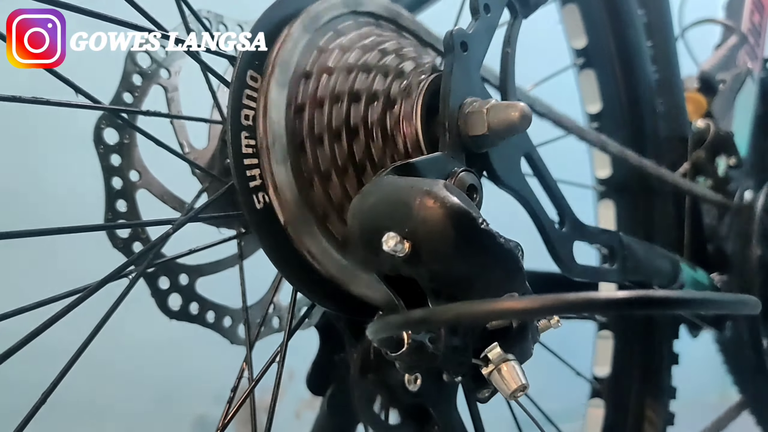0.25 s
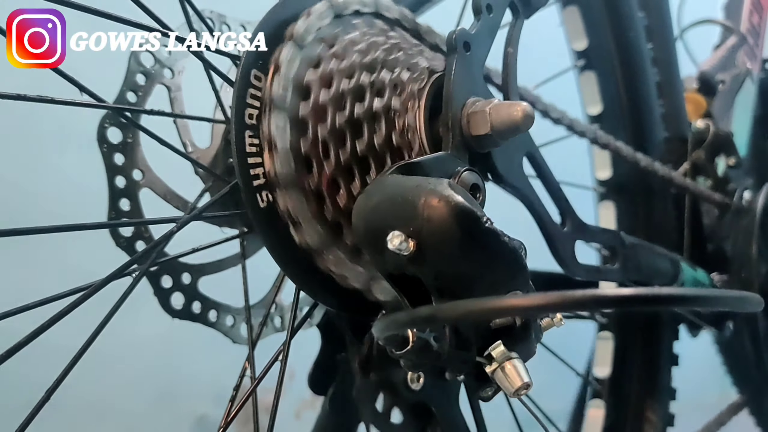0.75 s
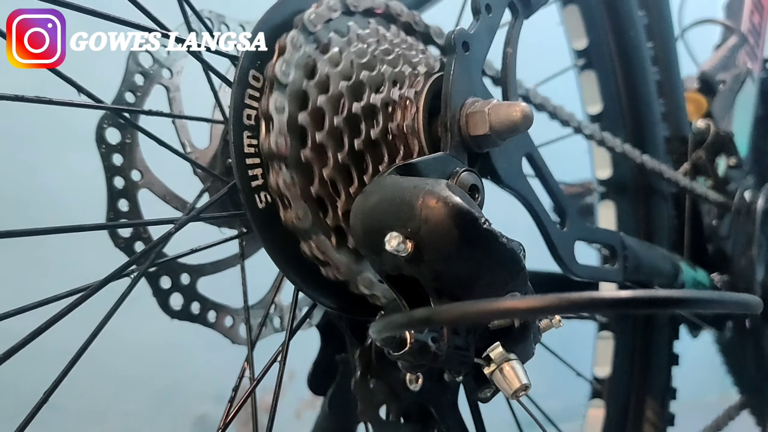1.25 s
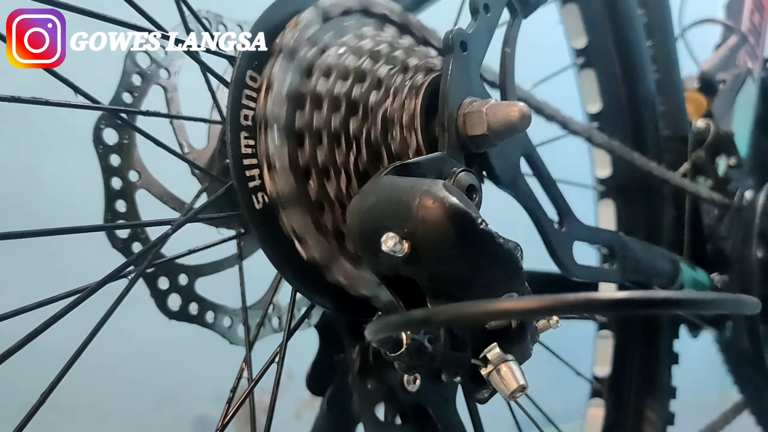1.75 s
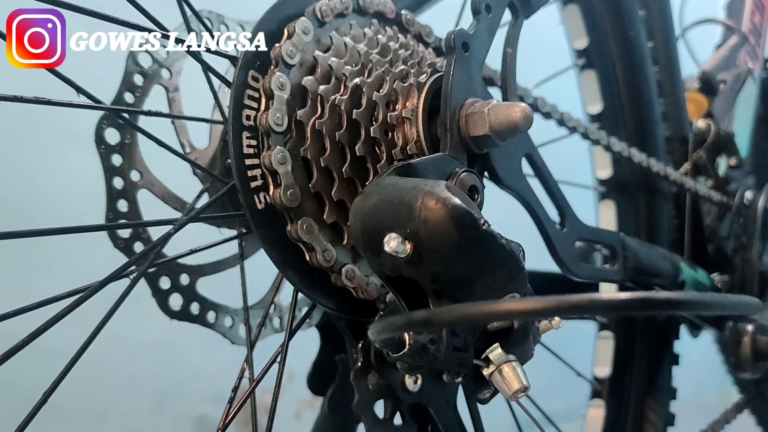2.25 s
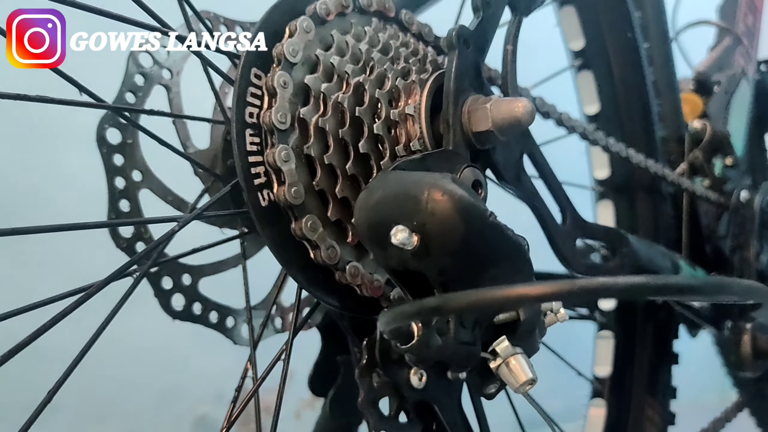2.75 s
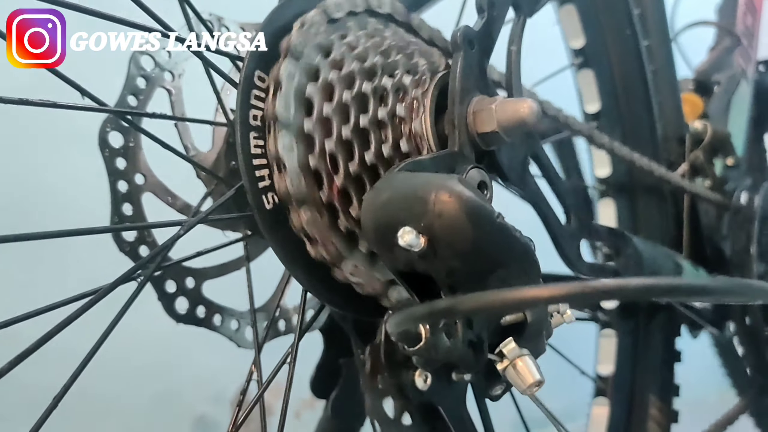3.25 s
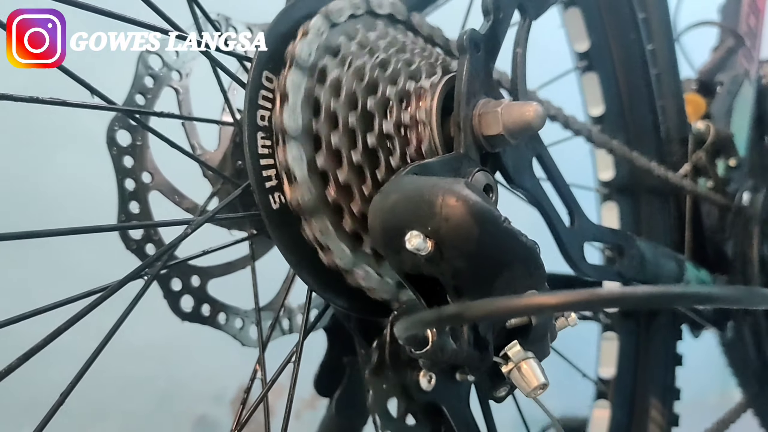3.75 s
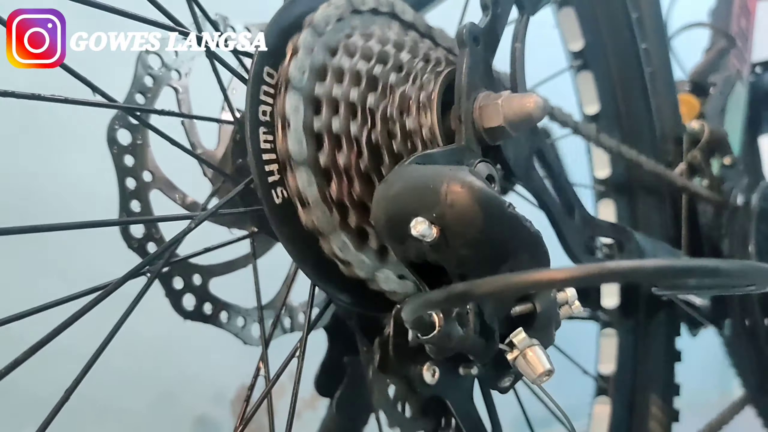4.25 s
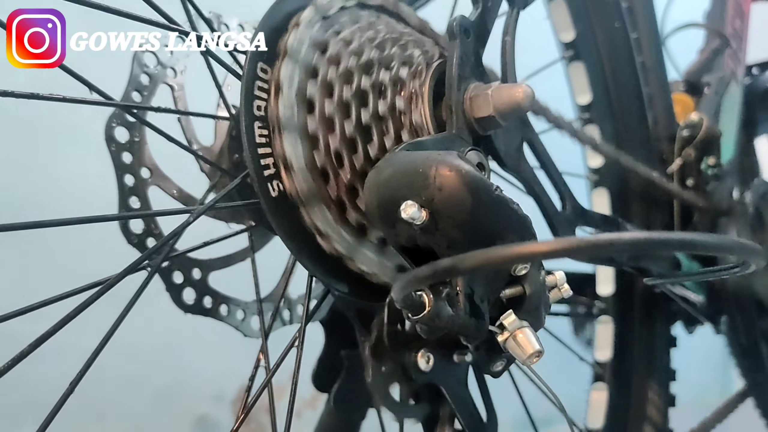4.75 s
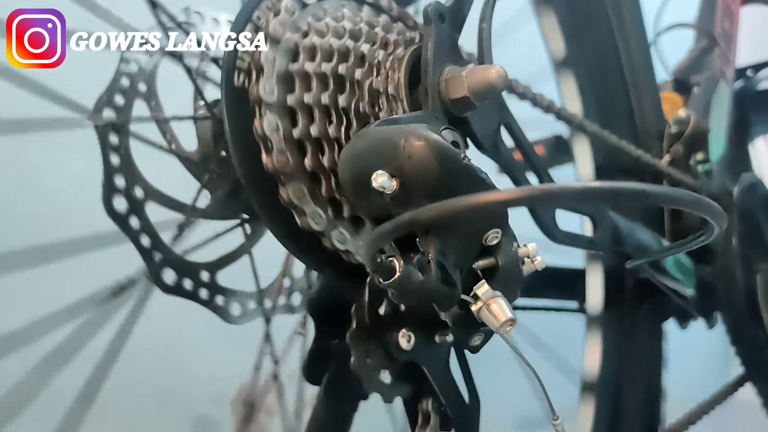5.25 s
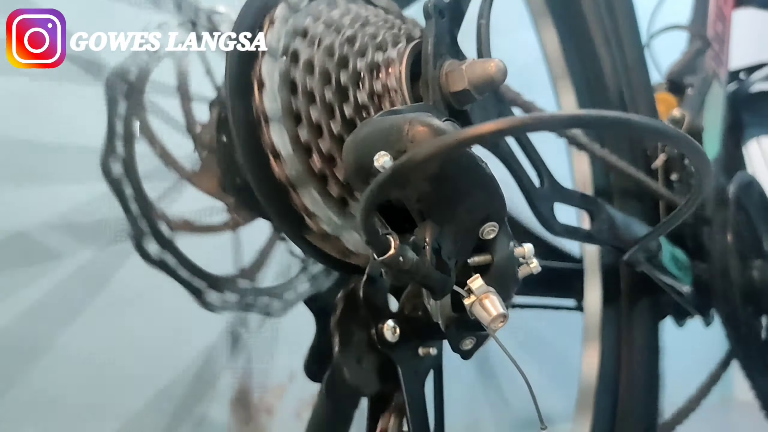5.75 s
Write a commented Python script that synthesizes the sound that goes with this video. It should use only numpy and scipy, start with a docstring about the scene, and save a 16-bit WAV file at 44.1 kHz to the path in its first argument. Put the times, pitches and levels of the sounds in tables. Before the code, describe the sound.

Close beside a bicycle's rear sprockets in a ringing room, the chain runs backwards with a soft whir and rapid bright ratchet ticks. The frame suddenly clacks and judders loudly, leaving a metallic ring. The ticking slows to a stop, dull thuds follow, then a second spin clicks along with sharp snaps. Finally the chain drives forward, rasping, humming and knocking.

```python
"""Bicycle drivetrain in a ringing room

Heard from beside the rear sprockets of a bicycle on a stand. The pedals turn backwards in two spins: jockey-wheel
rollers whir as bands of noise and freewheel pawls tick once a ratchet tooth. The frame clacks and judders in two
ringing modes. Gear parts snap as shaped noise with a short ring, and an askew chain rasps in dense grains.
Driven forwards at the end, the chain hums, rasps and knocks. A room tail follows the blows, ticks and squawks."""
import sys
import numpy as np
from scipy import signal
from scipy.fft import rfft, irfft, next_fast_len
from scipy.io import wavfile
from scipy.ndimage import uniform_filter1d, map_coordinates

SR = 44100
rng = np.random.default_rng(int(sys.argv[2]) if len(sys.argv) > 2 else 0)


def master_out(mix):
    """Clip the mix to full scale and print it as 16-bit PCM to the path in sys.argv[1]."""
    frames = np.transpose(np.atleast_2d(mix))
    ceiling = np.clip(frames, -1, 1)
    pcm = np.round(ceiling * 32767).astype(np.int16)
    wavfile.write(sys.argv[1], SR, pcm)


N = 264159
EASY_SPEED = 30  # ratchet teeth per s at which speed-dependent levels are stated

# sprocket speed in the two backward spins: time_s, speed [ratchet teeth per s]
FIRST_SPIN = [(0.008, 40.13), (0.325, 51.08), (0.504, 61.92), (0.51, 52.77), (0.784, 33.95), (0.848, 42.79),
              (0.984, 24.99), (1.078, 23.06), (1.175, 24.68), (1.443, 20.2), (1.723, 30.56), (1.734, 39.79),
              (1.949, 34.84), (2.062, 30.74), (2.256, 4.65)]
SECOND_SPIN = [(3.066, 17.27), (3.431, 19.66), (3.451, 25.43), (3.626, 17.13), (3.824, 30.08),
               (3.991, 22.2), (4.228, 31.42), (4.328, 24.77), (4.575, 28.86), (4.644, 20.18)]
# colour of rustling links and loose rollers: frequency_hz, level_db [per Hz]
RUSTLE_TONE = [(600, -36), (1500, -6.5), (2200, 0), (3000, 4.5), (5000, 2), (8000, -6.5), (12500, 1.5),
               (16000, 1.5)]
# resonances of sprockets and derailleur: centre_hz, width_hz, gain_db
STEEL_MODES = [(1430, 110, 4), (1677, 90, 6.5), (2390, 90, 4.5), (2970, 120, 4.5), (3390, 45, 7.5),
               (3840, 1000, 4.5), (4700, 200, 3.5), (5010, 120, 1.5), (7120, 200, 4), (7380, 120, 0)]


def amp(db):
    """Decibels to gain."""
    return 10 ** (np.asarray(db) / 20)


def unit(x):
    """Scale to rms 1."""
    return x / np.sqrt(np.mean(x ** 2) + 1e-20)


def along(points, hz):
    """Read (Hz, value) points on a log frequency axis."""
    f, v = np.transpose(points)
    return np.interp(np.log(hz + 1), np.log(f + 1), v)


def coloured(points):
    """Gain response that follows (Hz, dB) points."""
    return lambda hz: amp(along(points, hz))


def curves(rows):
    """One value per sample for each column after the time."""
    s, *columns = np.transpose(rows)
    return [np.interp(np.arange(N) / SR, s, column) for column in columns]


def wobble(rate):
    """A smooth random curve with rate knots a second."""
    knots = rng.standard_normal(int(N * rate / SR) + 4)
    return map_coordinates(knots, [np.arange(N) * rate / SR])


def filtered(x, response):
    """Weight the spectrum of x by a response of frequency."""
    n = x.shape[-1]
    padded = next_fast_len(n + 4096)
    spectrum = rfft(x, padded) * response(np.fft.rfftfreq(padded, 1 / SR))
    return irfft(spectrum, padded)[..., :n]


def add(track, s, sound):
    """Mix a sound into the track at time s."""
    i = max(round(s * SR), 0)
    part = track[..., i:i + sound.shape[-1]]
    part += sound[..., :part.shape[-1]]


def noise(n, tone=lambda hz: 1):
    """Stereo noise of rms 1, most alike in the low mids and nearly unrelated in the treble."""
    # likeness of left and right: frequency_hz, correlation [-1 to 1]
    likeness = [(60, 0.66), (380, 0.91), (950, 0.47), (2400, 0.077), (6000, 0.057)]

    def mid_side(hz):
        turn = np.arccos(np.clip(along(likeness, hz), -1, 1)) / 2
        return tone(hz) * np.array([np.cos(turn), np.sin(turn)])

    mid, side = filtered(rng.standard_normal((2, n)), mid_side)
    return unit(np.array([mid + side, mid - side]))


def resonances(modes, hz):
    """Summed dB peaks and hollows, as a gain."""
    return amp(sum(db / (1 + (2 * (hz - centre) / width) ** 2) for centre, width, db in modes))


def room(x):
    """The room's answer: a diffuse tail of unit energy on the left, each frequency dying at its own speed."""
    # reverberation time: frequency_hz, t60_s
    decay_times = [(100, 0.39), (600, 0.7), (2000, 0.51), (5000, 0.6), (10000, 0.52), (15000, 0.47)]
    hz, t, bins = signal.stft(noise(SR), SR, nperseg=256)
    t60 = np.maximum(along(decay_times, hz), .05)[:, None]
    tail = signal.istft(bins * amp(-60 * t / t60), SR, nperseg=256)[1]
    tail *= 1 - np.exp(-np.arange(tail.shape[1]) / SR / .0016)  # builds up over a few ms
    return signal.fftconvolve(x, tail / np.linalg.norm(tail[0]), axes=1)


def spin_speed(spin):
    """Teeth per second at each sample, zero outside the spin."""
    s, speed = np.transpose(spin)
    return np.interp(np.arange(N) / SR, s, speed, left=0, right=0)


def whir():
    """Rollers drum on the jockey wheels: a narrow noise band glides along the roller pitch."""
    # roller whir: time_s, pitch_hz, level_db
    whir_path = [(0, 386, -61.5), (.2, 385.9, -63.5), (.36, 388.4, -56), (.55, 388, -61), (.85, 388, -66),
                 (1.05, 378.9, -64.5), (1.2, 381.8, -70.5), (1.4, 388.1, -67.5), (1.9, 393, -59.5),
                 (2.15, 374, -65.5), (2.5, 344.8, -79), (3, 359, -76.5), (3.25, 348.3, -63.5),
                 (3.45, 365.6, -75), (3.9, 378.6, -69.5), (4.3, 381.9, -69), (4.75, 372.7, -59.5),
                 (5.3, 369.6, -62), (5.99, 364, -62.5)]
    width_hz = 42
    pitch, level_db = curves(whir_path)
    centre = np.mean(pitch)

    def peak(hz):
        return (1 + ((hz - centre) / width_hz) ** 2) ** -1.1 * hz / np.hypot(hz, 200)

    band = signal.hilbert(noise(N, peak))
    # evenly spaced rollers keep the whir steady
    band /= np.sqrt(uniform_filter1d(np.mean(abs(band) ** 2, axis=0), SR // 8) / 2)
    glide = np.exp(2j * np.pi * np.cumsum(pitch - centre) / SR)
    return amp(level_db) * np.real(band * glide)


def clatter():
    """The links clatter as low-mid noise with a quickly fluctuating level."""
    # clatter level: time_s, level_db
    clatter_path = [(0, -59.5), (.25, -60), (.45, -56), (1.2, -70.5), (1.8, -59), (2.12, -59.5),
                    (2.35, -72), (2.7, -102), (3.68, -86), (3.79, -66.5), (4.15, -71.5), (4.55, -65),
                    (4.95, -58.5), (5.38, -65.5), (5.6, -61.5), (5.99, -61.5)]
    # clatter colour: frequency_hz, level_db [per Hz]
    clatter_colour = [(200, -14.5), (500, -0.5), (700, -1), (1100, -6.5), (1600, -1.5), (2200, -7),
                      (4000, -13)]
    [level_db] = curves(clatter_path)
    return amp(level_db) * unit(noise(N, coloured(clatter_colour)) * amp(1.8 * wobble(150)))


def rustle(speed, forwards):
    """The links rustle as grainy bright noise, louder with speed and much quieter when taut."""
    # growth with speed: level_db at EASY_SPEED, rise [dB per doubling], floor_db at rest
    easy_db, db_per_doubling, rest_db = (-57, 7.1, -73)
    taut_db, grain_db, pan_db = -26, 2, 1
    moving_db = easy_db + db_per_doubling * np.log2(np.maximum(speed, 1) / EASY_SPEED)
    level = np.hypot(amp(moving_db), amp(rest_db))
    grainy = unit(noise(N, coloured(RUSTLE_TONE)) * amp(grain_db * wobble(400)))
    return level * amp(taut_db * (forwards > 0)) * grainy * amp([[pan_db], [-pan_db]])


def rollers(speed):
    """Loose rollers tick faintly at random times, denser as the chain runs faster."""
    ticks_per_tooth, spread_db, level_db, life_s = 2, 3, -61, .0007
    strength = amp(spread_db * np.clip(rng.standard_normal(N), -2, 1))
    hits = (rng.random(N) < ticks_per_tooth * speed / SR) * strength
    gain = signal.lfilter([1], [1, -np.exp(-1 / (life_s * SR))], hits)
    return amp(level_db) * gain * noise(N, coloured(RUSTLE_TONE))


def grinding():
    """Link plates catch and slip in dense grains, now on one sprocket, now on its neighbour."""
    # rasp colour: frequency_hz, level_db [per Hz]
    rasp_colour = [(200, -42), (600, -49), (1200, -4.5), (1450, -1.5), (2500, 0.5), (4000, -5), (5000, 1.5),
                   (7300, -1.5), (8100, -1.5), (11000, 0), (13500, 1), (16000, 1.5)]
    sprocket_spread, wander_rate = .025, 14  # relative pitch spread; knots per s of the wandering
    grain_db, wander_db, ringing = 4, 3, 1.8  # ringing: exponent on the steel resonances
    out = np.zeros((2, N))
    for size in (1 - sprocket_spread, 1, 1 + sprocket_spread):
        grains = noise(N) * amp(grain_db * wobble(450) + wander_db * wobble(wander_rate))
        out += filtered(grains, lambda hz: coloured(rasp_colour)(hz) * resonances(STEEL_MODES, hz * size) ** ringing)
    return unit(out)


def scraping(rasp):
    """An askew chain scrapes the teeth beside it; a light scrape stirs only the higher resonances."""
    # scrapes: start_s, length_s, level_db, sag [dB per s, negative swells], lowest_hz
    scrapes = [(2.785, 0.29, -54.5, 40.5, 2580), (4.773, 0.35, -44, -13.5, 504)]
    attack_s, release_s = .079, .078
    t = np.arange(N) / SR
    out = np.zeros((2, N))
    for s, length, db, sag_db, lowest_hz in scrapes:
        swell = np.clip((t - s) / attack_s, 0, 1)
        release = np.exp(-np.maximum(t - s - length, 0) / release_s)
        scrape = filtered(rasp, lambda hz: hz ** 2 / np.hypot(hz ** 2, lowest_hz ** 2))
        out += amp(db - sag_db * np.clip(t - s, 0, length)) * swell * release * scrape
    return out


def mesh_hum():
    """Teeth meshing under drive hum as a sine with unsteady pitch and level."""
    # meshing hum: time_s, pitch_hz, level_db
    mesh_path = [(4.5, 298, -100), (4.7, 301.7, -65.5), (5, 312.8, -68), (5.3, 316, -64), (5.6, 314.5, -68),
                 (5.99, 308, -64.5)]
    pitch, level_db = curves(mesh_path)
    phase = 2 * np.pi * np.cumsum(pitch + 2 * wobble(18)) / SR
    return amp(level_db + 1.5 * wobble(12)) * np.sin(phase)


def chain():
    """All sounds of the running chain, with rustle and roller ticks tied to its speed."""
    # forward drive, pawls locked: time_s, speed [ratchet teeth per s]
    drive_path = [(4.65, 46), (4.8, 62), (5.08, 49), (5.38, 30), (5.55, 43), (5.72, 38), (5.99, 49)]
    forwards = spin_speed(drive_path)
    speed = np.maximum(spin_speed(FIRST_SPIN) + spin_speed(SECOND_SPIN), forwards)
    links = clatter() + rustle(speed, forwards)
    return whir() + links + rollers(speed) + scraping(grinding()) + mesh_hum()


def rumble():
    """The dull floor of stand and room, with a low hum that swells as the first spin runs out."""
    # rumble level before the common lift: time_s, level_db
    rumble_path = [(0, -79.5), (.35, -73), (1.2, -76), (2.25, -66), (2.8, -73), (3.55, -77), (3.9, -72.5),
                   (4.45, -78.5), (4.75, -72.5), (5.99, -74.5)]
    # rumble colour: frequency_hz, level_db [per Hz]
    rumble_colour = [(20, -16.5), (50, -12), (90, -10), (135, 0.5), (180, -1), (260, 4.5), (420, -1.5),
                     (540, -12), (680, -24.5), (1050, -35.5), (2000, -32)]
    # low hum: time_s, level_db
    hum_path = [(0, -84), (1.4, -78.5), (2, -74), (2.3, -67), (2.7, -73), (3.3, -85), (4.6, -85.5),
                (5.99, -80)]
    lift_db, hum_hz = 3, 139
    [floor_db] = curves(rumble_path)
    [hum_db] = curves(hum_path)
    hum_phase = 2 * np.pi * np.cumsum(hum_hz + 2 * wobble(20)) / SR
    hum = amp(hum_db + 2 * wobble(10)) * np.sin(hum_phase)
    return hum + amp(floor_db + lift_db) * noise(N, coloured(rumble_colour))


def pawl_drops():
    """(s, speed) each time a ratchet tooth passes during a backward spin."""
    drops = []
    for spin in (FIRST_SPIN, SECOND_SPIN):
        s, speed = np.transpose(spin)
        t = np.arange(s[0], s[-1], 1 / SR)
        teeth = np.cumsum(np.interp(t, s, speed)) / SR
        times = np.interp(np.arange(teeth[-1]), teeth, t)
        drops += zip(times, np.interp(times, s, speed))
    return drops


def pawls():
    """Each pawl slides off its tooth and snaps down with a bright tick and a short ping of the sprockets."""
    # spread from tooth to tooth: level_db, tilt [dB per octave], ping_db, detuning [ratio]
    tooth_scatter = (1, .5, 1.8, .035)
    # tick colour shared by both sides, then opposed between them: frequency_hz, level_db [per Hz]
    mid_colour = [(500, -38), (2200, -20), (3100, -9), (5000, -11), (7500, -15), (10500, -23.5),
                  (12100, -3.5), (13200, -1), (14500, -12.5), (16000, -6)]
    side_colour = [(500, -29.5), (2300, -17), (3050, -11.5), (3900, -13), (5200, -6.5), (7500, -16.5),
                   (10500, -16), (12200, -3), (13500, -3.5), (16000, -17.5)]
    # pawls that catch harder: time_s, extra_db
    hard_catches = [(.08, 1.5), (.105, 2), (.173, 2.5), (.552, 2), (.761, 2), (.817, 2.5), (1.116, 1),
                    (1.327, 2.5), (1.735, 1.5), (2.158, 4), (3.066, 1), (3.728, 1.5), (3.838, 2.5),
                    (3.95, 2), (3.993, 2.5), (4.077, 1.5), (4.186, 1.5), (4.286, 2)]
    easy_db, db_per_doubling, room_db = -50, 1.6, -5  # easy_db: level at EASY_SPEED
    ping_hz, ping_db, ping_life_s = 3040, 1.2, .0014
    t = np.arange(SR // 80) / SR - .002  # the snap comes at t = 0
    swell, after = np.exp(np.minimum(t, 0) / .0005), np.maximum(t, 0)
    rebound = amp(-17) * np.exp(-after / .004)
    shape = swell * (np.exp(-after / .0014) + rebound)
    ticks = np.zeros((2, N))
    for s, speed in pawl_drops():
        catch_db, tilt_db, force_db, detune = rng.normal(0, tooth_scatter)  # no two teeth catch alike
        hard_db = sum(more for at, more in hard_catches if abs(at - s) < .008)
        db = easy_db + db_per_doubling * np.log2(speed / EASY_SPEED) + catch_db + hard_db

        def tone(hz):
            colours = np.array([along(mid_colour, hz), along(side_colour, hz)])
            return amp(colours + tilt_db * np.log2((hz + 500) / 6000))

        tick = unit(shape * noise(len(t), tone))
        wave = np.sin(2 * np.pi * (ping_hz * (1 + detune) * t + rng.random()))
        ping = amp(ping_db + force_db) * amp([[-2], [2]]) * swell * np.exp(-after / ping_life_s) * wave
        add(ticks, s - .002, amp(db) * (tick + ping))
    return ticks + amp(room_db) * room(ticks)[:, :N]


def frame():
    """Stick and slip drive two modes of the frame in bursts; each burst leaves it ringing."""
    # squawks: start_s, length_s, low_hz, high_hz, low_db, high_db [levels at the start]
    squawks = [(.946, .01, 635, 1216, -46, -51), (.975, .01, 660, 1216, -48, -55),
               (1.346, .02, 662, 1285, -21.5, -39), (1.353, .013, 662, 1280, -44, -29),
               (1.372, .02, 672, 1250, -28, -43), (1.3995, .012, 660, 1271, -41, -22.5),
               (1.4238, .015, 660, 1262, -31, -19.5), (1.436, .006, 720, 1290, -31, -38),
               (1.451, .035, 652, 1250, -37, -35), (1.548, .012, 670, 1250, -43, -28.5),
               (1.568, .015, 735, 1285, -41, -28.5), (1.587, .04, 672, 1250, -33, -38)]
    # after-ring modes: frequency_hz, level_db [relative to the squawk], t60_s
    ring_modes = [(555, -6, .6), (642, -4, .5), (670, -2.5, .65), (730, -7, .8), (778, -7, .8),
                  (921, -6, .8), (1089, -10, .7), (1114, -7, .75), (1138, -6, .85), (1196, -5, .7),
                  (1250, 1, .8), (1291, -1, .7), (1371, -9, .6), (1401, -10, .55), (1675, -12, .55),
                  (1925, -15, .45), (1952, -15, .45), (2218, -9, .5)]
    # crackle of stick and slip between the modes: frequency_hz, level_db [per Hz]
    grit_colour = [(250, -30), (520, 0), (1000, 0), (1700, -3), (2300, -5), (3200, -25), (8000, -50)]
    sag_db_per_s, release_s, waver, grit_db, room_db = 230, .003, .003, -15, -9.5  # waver: relative pitch
    split_hz, ring_db, scatter_db, blur_hz = 950, -22.3, 2, 1
    t = np.arange(SR) / SR
    out = np.zeros((2, N))
    pans = [amp([[2.8], [-2.8]]), amp([[-2.8], [2.8]])]  # low modes lean left, high modes right
    lead_rad = np.array([[0], [1]])  # the wave reaches the right side first
    for s, length, low_hz, high_hz, low_db, high_db in squawks:
        gate = (1 - np.exp(-t / .0006)) * np.exp(-np.maximum(t - length, 0) / release_s)
        for hz, db, pan in zip((low_hz, high_hz), (low_db, high_db), pans):
            pitch = hz * (1 + waver * wobble(67)[:len(t)])
            wave = np.sin(2 * np.pi * np.cumsum(pitch) / SR + lead_rad)
            burst = pan * amp(db - sag_db_per_s * t) * gate * wave
            add(out, s, burst)
            add(out, s + length / 2, amp(room_db) * room(burst[:, :SR // 16]))
        grit = amp(max(low_db, high_db) + grit_db) * gate * noise(len(t), coloured(grit_colour))
        add(out, s, grit)
        for hz, db, t60 in ring_modes:
            high = int(hz > split_hz)  # a mode takes its energy from the nearer squawk
            start_db = db + rng.normal(0, scatter_db) + ring_db + (low_db, high_db)[high]
            fade = amp(start_db - 60 * t / t60) * (1 - np.exp(-t / .0025))
            # loose parts blur the ring
            drift = np.cumsum(rng.standard_normal(len(t))) * np.sqrt(2 * np.pi * blur_hz / SR)
            wave = np.sin(2 * np.pi * (hz * t + rng.random()) + drift + lead_rad)
            add(out, s, pans[high] * fade * wave)
    return out


def blows(events, colour, pivot_hz, ring_db, room_db, crack_s, rattle_s, ring_life_s):
    """A sharp crack, a brief rattle and the ring of the struck part, spread by the room."""
    rattle_db, overtone, overtone_db, ring_room_db = -14, 1.73, -7, -10
    t = np.arange(SR // 16) / SR
    attack = 1 - np.exp(-t / .0003)
    shape = attack * (np.exp(-t / crack_s) + amp(rattle_db) * np.exp(-t / rattle_s))
    # the room gathers all directions, which evens out the crack's colour
    push = np.linalg.norm(shape) * (t == 0)[None]

    def mode(hz):
        fade = np.exp(-t / ring_life_s * np.sqrt(hz / 2000))  # low modes last longer
        return attack * fade * np.sin(2 * np.pi * (hz * t + .18 * rng.random((2, 1))))

    def lead(x):  # 5 ms ahead, where the filter can spread
        return np.pad(x, ((0, 0), (SR // 200, 0)))

    out = np.zeros((2, N))
    for s, db, tilt_db, ring_hz, own_ring_db, hard_db in events:
        def tone(hz):
            tilted = amp(along(colour, hz) + tilt_db * np.log2((hz + 100) / pivot_hz))
            return tilted * resonances(STEEL_MODES, hz) * (hz / np.hypot(hz, 70)) ** 2

        ring = amp(ring_db + own_ring_db) * lead(mode(ring_hz) + amp(overtone_db) * mode(overtone * ring_hz))
        onset = s - .005
        # a harder contact lifts mainly the first instant
        contact = shape * amp(hard_db * np.exp(-t / (2 * crack_s)))
        direct = filtered(lead(contact * noise(len(t))), tone) + ring
        sent = filtered(lead(push), tone) + amp(ring_room_db) * ring
        add(out, onset, amp(db) * direct)
        add(out, onset, amp(db + room_db) * room(sent))
    return out


def clacks():
    """The frame takes hard blows and answers with a mid-heavy crack."""
    # clacks: start_s, level_db, brightness [dB per octave], ring_hz, ring_db, hardness_db
    clack_events = [(.946, -29.5, 1, 5020, 5, 4.5), (1.3465, -16, 1.1, 1686, 0, 4),
                    (1.399, -23.5, 0, 1330, 1, -2), (1.424, -24, 0, 747, -0.5, -2),
                    (1.548, -23, 0, 917, 2, -3)]
    # clack colour: frequency_hz, level_db [per Hz]
    clack_colour = [(130, -53.5), (650, 2.5), (2100, -13.5), (5200, -14.5), (13000, -15.5)]
    return blows(clack_events, clack_colour, pivot_hz=750, ring_db=-18, room_db=5.5,
                 crack_s=.0025, rattle_s=.023, ring_life_s=.006)


def thuds():
    """The stand thuds dully, its energy mostly in the bass."""
    # thuds: start_s, level_db, brightness [dB per octave], ring_hz, ring_db, hardness_db
    thud_events = [(1.425, -47.5, -6, 45, -0.5, 6), (2.601, -43.5, 3, 930, -1, 2),
                   (2.785, -33.5, 2, 92.5, -3, -13), (2.797, -31.5, 1.8, 141, -0.5, -2.5),
                   (5.245, -42, -1.5, 100.6, -1.5, -6)]
    # thud colour: frequency_hz, level_db [per Hz]
    thud_colour = [(40, -6), (90, 9), (140, 6), (210, 1.5), (650, -11), (2100, -26), (5200, -33),
                   (13000, -55)]
    return blows(thud_events, thud_colour, pivot_hz=230, ring_db=-20.5, room_db=-4,
                 crack_s=.0055, rattle_s=.027, ring_life_s=.01)


def snaps():
    """The chain snaps onto a sprocket with a bright crack and a long rattle."""
    # snaps: start_s, level_db, brightness [dB per octave], ring_hz, ring_db, hardness_db
    snap_events = [(2.615, -52.5, 2.5, 5230, -2, 11), (3.116, -26, 0.5, 3570, 0, -0.5),
                   (4.356, -36.5, -1.5, 1690, -5.5, 1), (4.361, -23.5, 1.1, 3170, -6, -0.5),
                   (4.6225, -45, 3, 4300, 5, -1), (4.642, -23.5, 1.9, 4740, 1, -2),
                   (4.643, -25.5, 1.5, 4080, 6.5, 3), (4.747, -24, -0.7, 3800, -5, 3),
                   (4.758, -31, 1.5, 3600, -6, 1), (5.094, -36, -1.5, 4720, 3, 2),
                   (5.464, -44, 2.5, 1610, 4, 5), (5.538, -41.5, -2.5, 2970, 0, 4),
                   (5.809, -36.5, 1.5, 7380, -9, 1.5)]
    # snap colour: frequency_hz, level_db [per Hz]
    snap_colour = [(130, -18), (480, -7.5), (1000, -8.5), (1700, -2.5), (5200, -1.5), (13000, -0.5)]
    return blows(snap_events, snap_colour, pivot_hz=5000, ring_db=-10, room_db=3.5,
                 crack_s=.0017, rattle_s=.046, ring_life_s=.0067)


def booms():
    """Each jerk of the chain sets the jockey-wheel cage ringing in one low mode."""
    # booms: start_s, level_db
    boom_events = [(3.117, -54), (4.75, -47), (5.09, -42), (5.465, -42), (5.543, -45), (5.81, -49.5)]
    boom_hz, attack_s, life_s = 372, .0031, .022
    t = np.arange(SR // 4) / SR
    swing = (1 - np.exp(-t / attack_s)) * np.exp(-t / life_s) * np.sin(2 * np.pi * boom_hz * t)
    out = np.zeros((2, N))
    for s, db in boom_events:
        add(out, s, amp(db) * swing)
    return out


def derailleur_knocks():
    """The derailleur knocks under drive: short cracks with little treble of their own."""
    # knocks: start_s, level_db, brightness [dB per octave], ring_hz, ring_db, hardness_db
    knock_events = [(5.232, -23.5, 4, 996, -5, -3), (5.2335, -25.5, 6.5, 2720, 0, -2),
                    (5.5455, -25.5, 2, 1667, 6, 0), (5.547, -30.5, 4, 2950, 3.5, -6),
                    (5.893, -34, 6.5, 2390, 3, -5), (5.988, -28, -1.5, 2940, 1, -6)]
    # knock colour: frequency_hz, level_db [per Hz]
    knock_colour = [(130, -3), (600, 4.5), (1100, 1.5), (2100, 0), (5200, -24.5), (13000, -30)]
    return blows(knock_events, knock_colour, pivot_hz=1690, ring_db=-10.5, room_db=-2.5,
                 crack_s=.0012, rattle_s=.02, ring_life_s=.004)


def scene():
    """The whole drivetrain, its running sounds coloured by the room's standing waves."""
    # bass standing waves, peaks and hollows: centre_hz, width_hz, gain_db
    standing_waves = [(154, 24, -6), (198, 14, 5.5), (224, 16, -6.5), (265.8, 14, 6.5), (316, 12, 6),
                      (339, 22, -4.5), (377, 13, 0.5), (416, 13, 5.5), (450, 40, 0.5), (534, 22, 5.5),
                      (990, 75, 6.5), (1138, 26, 10.5)]
    running = filtered(chain() + rumble(), lambda hz: resonances(standing_waves, hz))
    struck = clacks() + thuds() + snaps() + derailleur_knocks()
    return running + pawls() + frame() + struck + booms()


def record(dry):
    """The microphone port hollows out the upper treble, and a steep cutoff ends the band."""
    notch_hz, notch_width_hz, notch_db, top_hz = 9700, 750, -10, 15700

    def response(hz):
        port = amp(notch_db * np.exp(-((hz - notch_hz) / notch_width_hz) ** 2))
        return port / (1 + (hz / top_hz) ** 160)

    return filtered(dry, response)


dry = scene()
out = record(dry)
master_out(out)
```